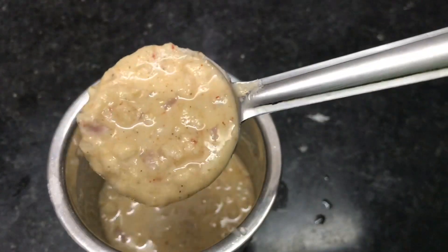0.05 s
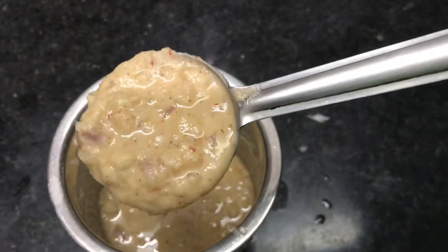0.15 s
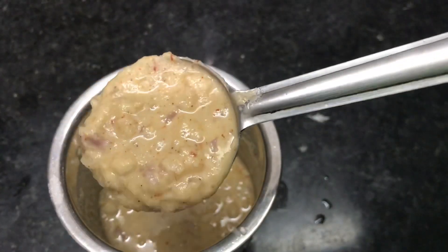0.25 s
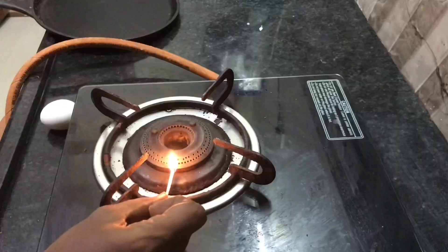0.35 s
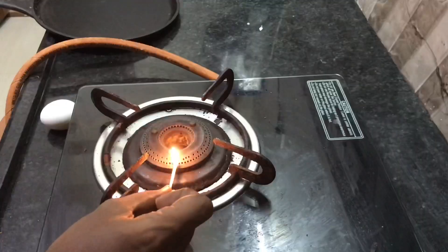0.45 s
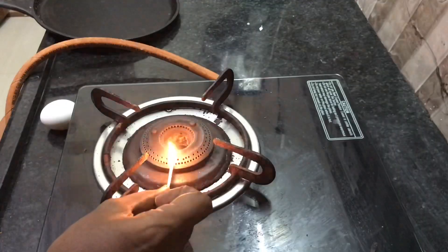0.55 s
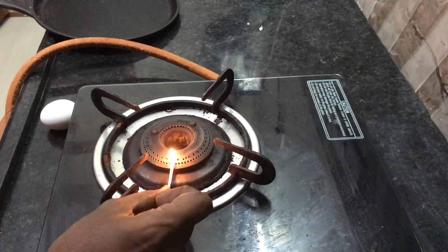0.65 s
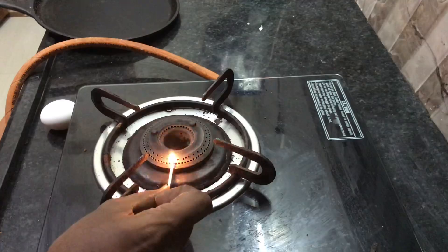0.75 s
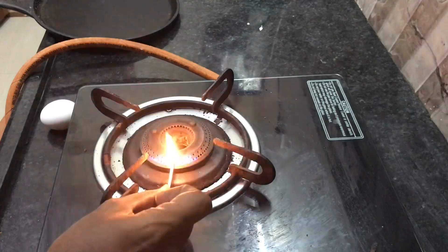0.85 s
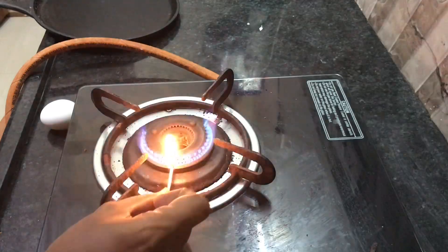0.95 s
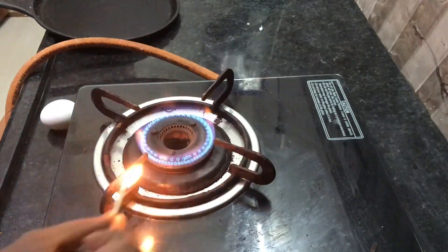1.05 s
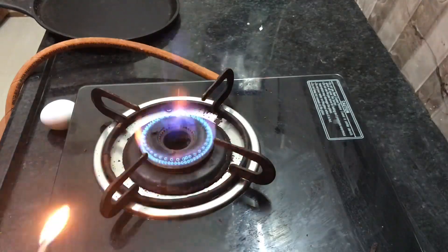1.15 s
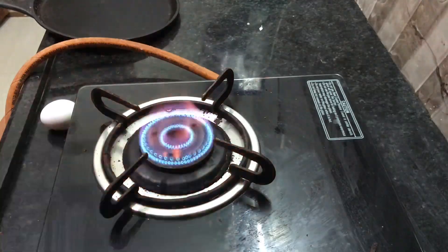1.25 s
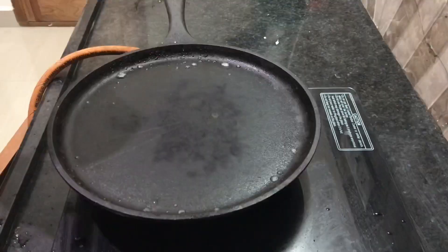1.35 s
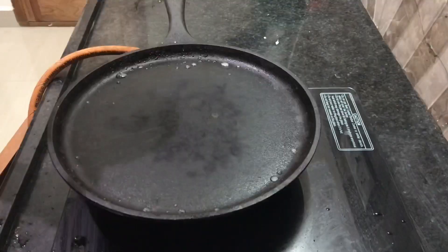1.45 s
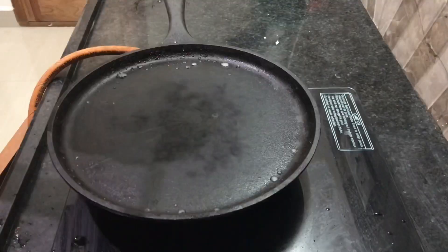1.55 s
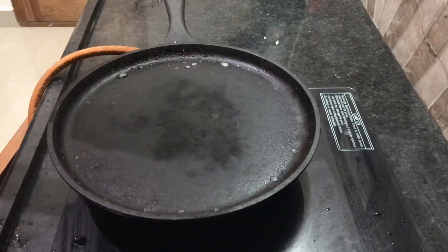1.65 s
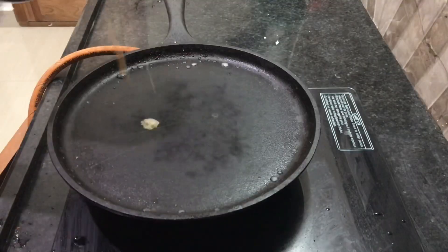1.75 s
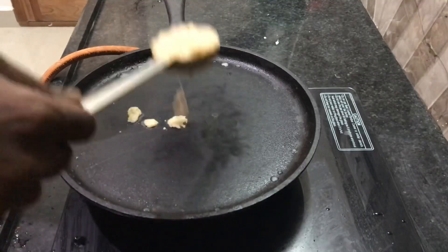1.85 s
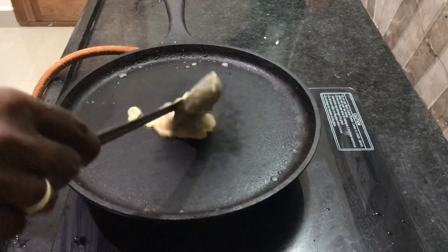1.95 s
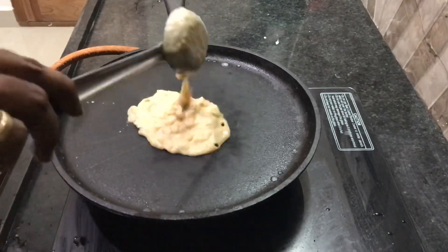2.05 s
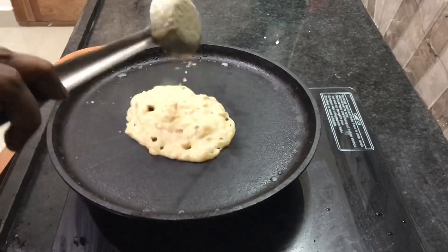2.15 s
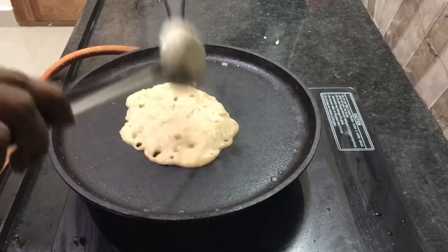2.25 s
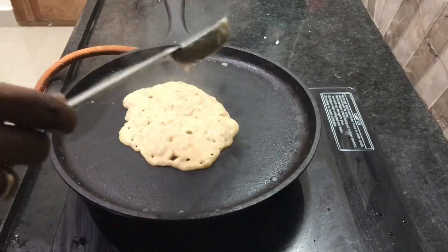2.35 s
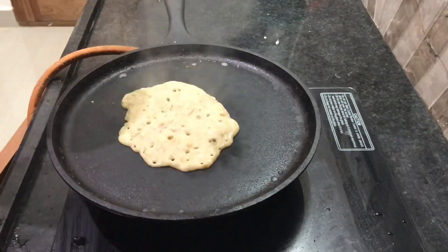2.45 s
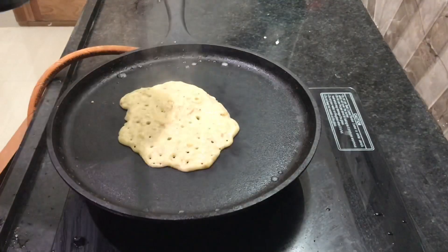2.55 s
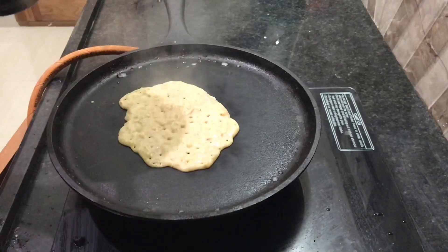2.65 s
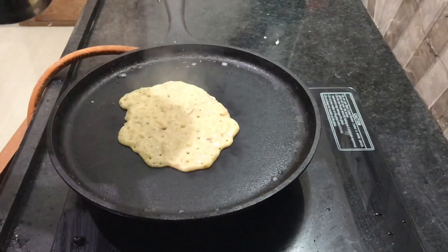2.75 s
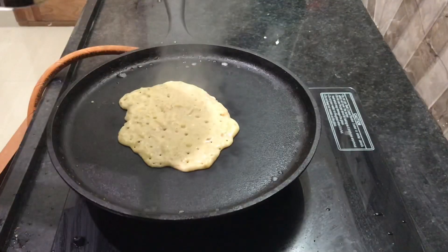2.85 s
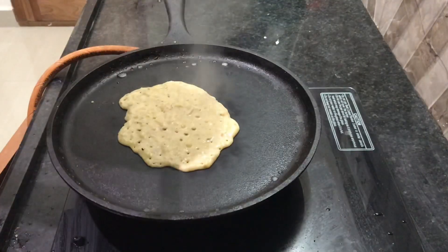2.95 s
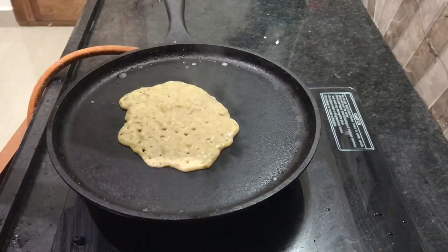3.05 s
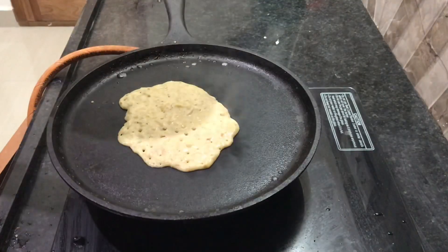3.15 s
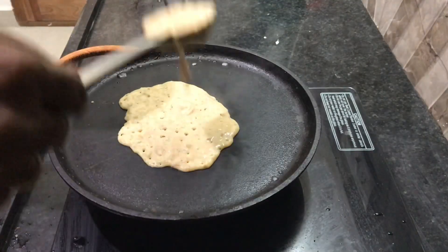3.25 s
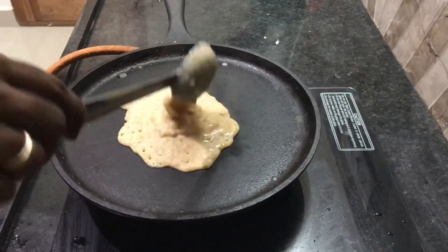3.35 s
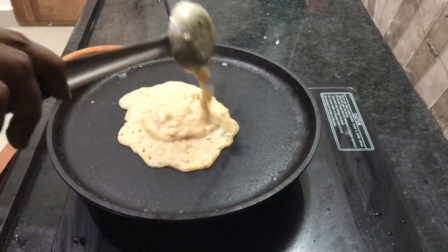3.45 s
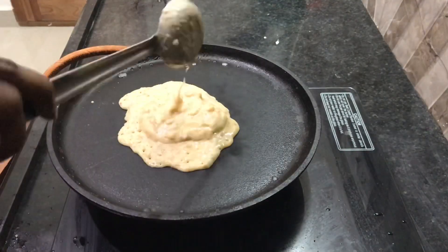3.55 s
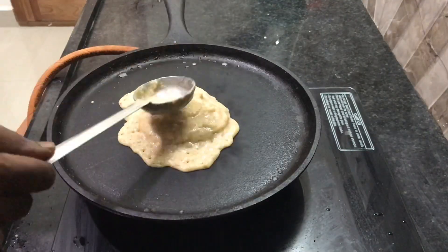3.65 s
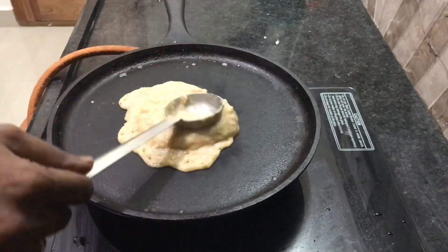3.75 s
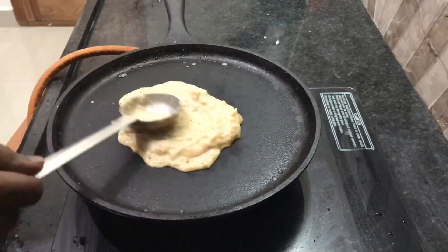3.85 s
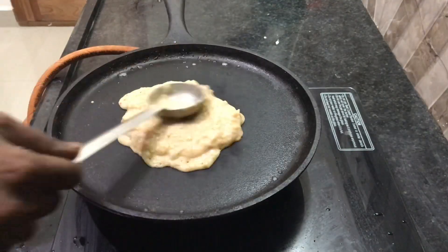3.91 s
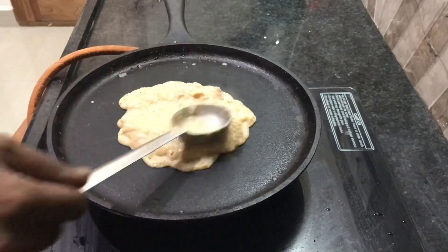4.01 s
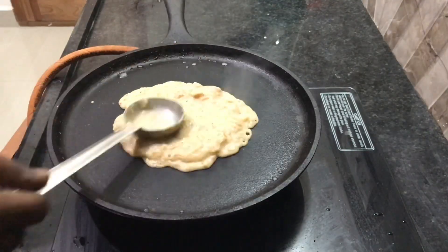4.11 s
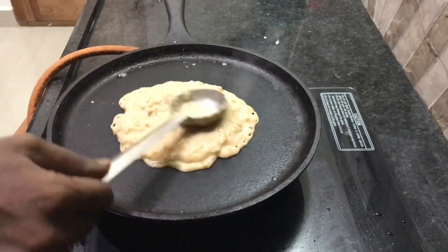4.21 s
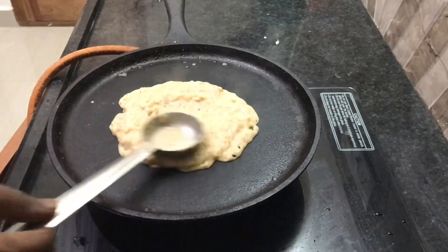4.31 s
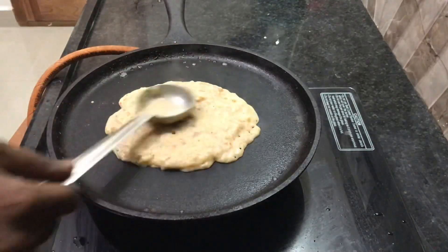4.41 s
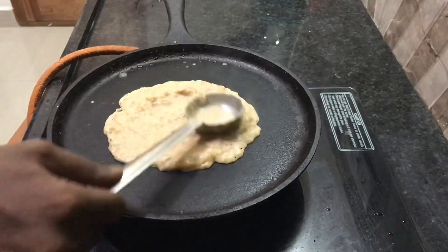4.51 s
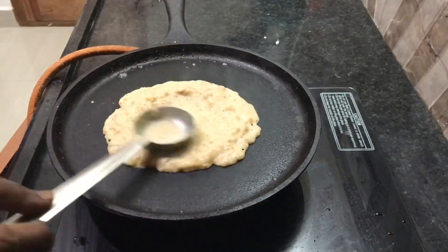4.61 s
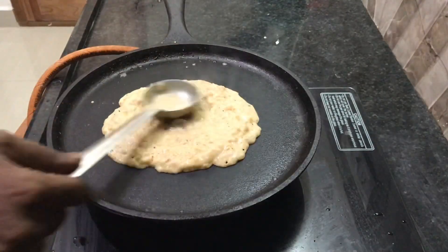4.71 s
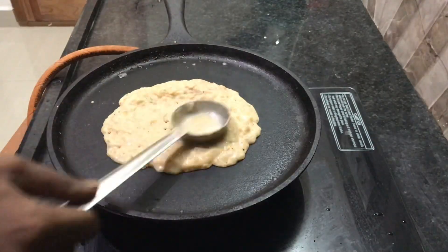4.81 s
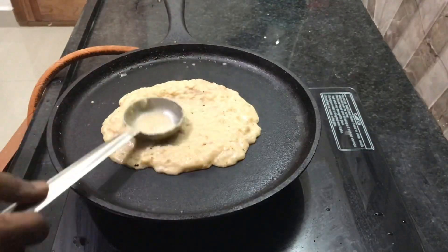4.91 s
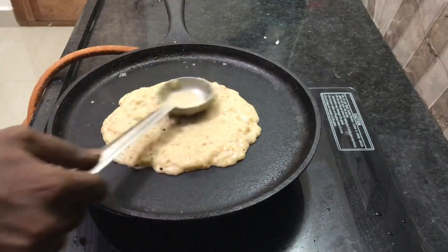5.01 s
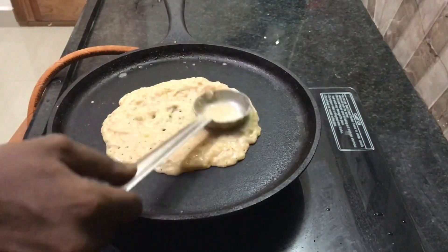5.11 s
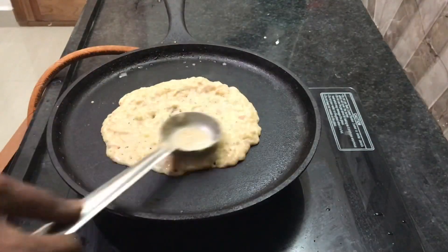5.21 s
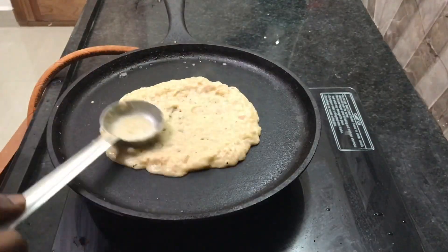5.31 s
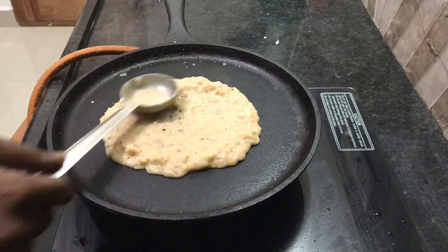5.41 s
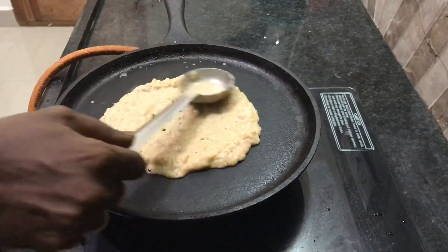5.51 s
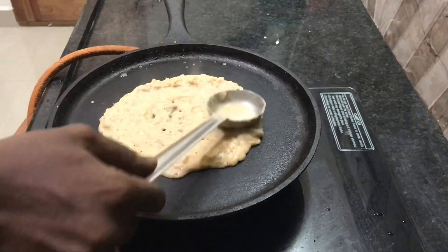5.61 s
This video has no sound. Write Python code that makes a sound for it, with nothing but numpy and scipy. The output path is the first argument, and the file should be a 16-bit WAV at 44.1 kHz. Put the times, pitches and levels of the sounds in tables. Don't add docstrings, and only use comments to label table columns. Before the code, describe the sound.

Three abruptly joined pieces, all close and nearly mono in a hard-walled home kitchen: quiet machine hum; knob and match knocks, one of them sharp, then gas igniting in two deep booms with crackling pops; lastly batter poured on hot iron, sizzling strongly, thinning to sparse spits, then swelling again with loud single steam bursts under the ladle.

```python
import sys
import numpy as np
from scipy import signal
from scipy.fft import rfft, irfft, next_fast_len
from scipy.io import wavfile
from scipy.ndimage import uniform_filter1d

SR = 44100
rng = np.random.default_rng(int(sys.argv[2]) if len(sys.argv) > 2 else 0)


def waveform_to_disk(signal):
    frames = np.transpose(np.atleast_2d(signal))
    scaled = np.clip(frames, -1, 1) * 32767
    samples = np.round(scaled).astype(np.int16)
    wavfile.write(sys.argv[1], SR, samples)


def amplitude_ratio(level_db):
    exponent = np.asarray(level_db, float) / 20
    return 10 ** exponent


N = 250047
T = np.arange(N) / SR

CUTS_S = [
    0.3204,
    1.318,
]
FADES_OUT_S = (.025, .022)
FADES_IN_S = (.03, .045)

# (frequency [Hz], density [dB per Hz])
ROOM_SPECTRA = [
    [(35, -52), (60, -26), (98, -17), (124, -15), (232, -12), (361, -11), (445, -11.5), (982, -22.5),
     (1530, -26.5), (3150, -34), (3620, -35), (4070, -40), (15700, -47.5)],
    [(35, -59), (60, -10.5), (260, -5.5), (361, -6.5), (477, -12), (815, -13.5), (937, -24), (1180, -19),
     (1970, -27.5), (3790, -31.5), (5500, -40), (7110, -39.5), (15700, -42)],
    [(35, -68), (60, -56), (86, -12.5), (145, -12.5), (308, -7), (333, -3), (388, -10.5), (426, -8.5),
     (687, -14.5), (1130, -21), (2400, -29.5), (3120, -60), (5280, -120)],
]
ROOM_LEVELS_DB = [-52.5, -49.5, -55.5]
# (frequency [Hz], width [Hz], level [dB], steadiness [ratio])
ROOM_TONES = [
    [(97.5, 1.8, -61.5, 3), (192, 7, -67, 1.7), (764, 10, -71, 1.5), (7400, 500, -82, .05),
     (230.3, 18, -63, 1.2), (300, 23, -77, 0.44), (1560, 11, -75.5, 0.81), (2116, 18, -77, .6),
     (3740, 53, -77, 1.2), (6980, 26, -85, .8), (7230, 20, -78, 2.8)],
    [(363, 13, -58, 1.7), (533, 5.1, -62.5, 0.78), (6950, 180, -77, .05), (7300, 170, -77.5, 0.31),
     (7600, 160, -86, .05)],
    [(199.3, 9.5, -66.5, 0.55), (389.4, 5.1, -65, 3.4), (1612, 12, -76.5, 2.3), (2460, 60, -78, 0.35)],
]
# (on [s], off [s], frequency [Hz], level [dB])
JET_WHISTLE = (.8, 1.1, 4480, -76)
HUM_HZ, HUM_DB = 98.4, -68
BEAT_HZ, BEAT_TOP_S, BEAT_SHARE = .87, 2.0, .55

# (time [s], flare [dB], upper boom over deep boom [dB])
FLARES = [
    (0.82, -65, 0),
    (0.902, -48, -2),
    (1.01, -47.5, 6.5),
    (1.048, -57, 14),
    (1.094, -74, 8),
    (1.178, -36, -8),
    (1.22, -42.5, -3.5),
    (1.278, -55.5, 8.5),
    (1.31, -87, 4),
]
# (frequency [Hz], width [Hz], level [dB])
HOLLOW_MODES = [
    [(129, 45, -5.5), (204.4, 22, 0.5)],
    [(278, 39, 6), (373, 39, 4), (510, 22, -28)],
]

# (time [s], peak [dB], thump [dB], body [dB], edge [dB])
STOVE_KNOCKS = [
    (.4104, -42.5, 6, 4, -28),
    (.533, -58.5, -2, 15, -14),
    (.5490, -51, 1.5, 12, -15),
    (.5552, -43.5, 10, 11, -3),
    (.5646, -23, -19, -5.5, -36),
    (.7686, -40.5, 3, 3, -28),
]
# (time [s], peak [dB], edge [dB])
FLAME_POPS = [(1.1614, -58, -16), (1.176, -44, -11), (1.1813, -48, -11), (1.1884, -49, -15),
              (1.1993, -46.5, -17), (1.219, -59, -6), (1.2396, -59, 6), (1.2472, -55, -19),
              (1.257, -50, -13)]
# (frequency [Hz], level [dB], T60 [s])
STEEL_MODES = [(688, 1, 0.071), (1387, 3.5, 0.053), (1590, -4.5, 0.1), (2090, -15, 0.027),
               (2740, -7, 0.073), (3780, 2.5, 0.07), (4888, -26, 0.22), (5830, -26, 0.13),
               (6850, -23, 0.26), (7340, -28, 0.032), (8750, -27, 0.14), (9900, -34, 0.13)]
KNOCK_T60_S, POP_T60_S = 0.11, 0.039
POP_THUMP_DB, POP_BODY_DB = -8, 15

# (time [s], peak [dB])
LONE_BURSTS = [(1.7979, -25), (2.6965, -20), (2.9028, -21), (3.0969, -25), (3.2316, -29), (3.3069, -27),
               (3.3505, -31), (3.3956, -30), (3.4166, -31), (3.4871, -33), (3.5051, -26), (3.5638, -32),
               (3.6459, -34), (3.7133, -35), (3.7526, -32), (3.798, -28), (3.8855, -25), (4.0603, -19),
               (4.1605, -20), (4.4686, -17), (4.5204, -22), (5.2124, -27), (5.2229, -25), (5.2598, -26),
               (5.282, -25), (5.3033, -26), (5.3627, -27), (5.3787, -26), (5.4021, -27), (5.4603, -28)]
# (time [s], peak [dB], frequency [Hz])
OIL_SNAPS = [
    (1.367, -47, 7400),
    (1.3756, -55, 4120),
    (1.3933, -40, 4220),
    (1.5164, -55, 11700),
    (1.6534, -48, 5560),
    (1.711, -47, 7000),
    (1.723, -41.5, 10300),
    (1.7628, -43, 6940),
]

# (time [s], vigour [dB], freshness of the wet edge [0-1])
BOIL_COURSE = [(1.762, -60, .8), (1.77, -46.5, 0.62), (1.95, -39.5, 0.68), (2.15, -36.5, 0.44),
               (2.45, -38, 0.65), (2.9, -42.5, 0.34), (3.35, -49, 0.13), (3.72, -54, .3),
               (3.76, -50.5, 0.52), (3.93, -47.5, 0.7), (3.985, -42, 0.73), (4.08, -41.5, 0.87),
               (4.2, -41, 0.7), (4.4, -40.5, .45), (4.62, -41.5, 0.48), (5.19, -45, .3), (5.26, -46, .55),
               (5.6, -46.5, 0.3)]
# (frequency [Hz], density [dB per Hz])
LARGE_BUBBLES = [(500, -35.5), (620, -29), (760, -17), (900, -19.5), (1300, -8), (1620, -15.5),
                 (1850, -10.5), (2150, -13), (2500, -14.5), (2650, -38.5)]
# (frequency [Hz], density [dB per Hz])
POUR_BUBBLES = [(2450, -43.5), (2600, -6), (2750, -4.5), (2950, -8.5), (3200, -4), (3700, -3), (4280, -7),
                (4700, -2.5), (5200, -3.5), (6500, -0.5), (8000, 3), (10200, 6.5), (14400, 3.5),
                (15800, -1)]
# (frequency [Hz], density [dB per Hz])
SPREAD_BUBBLES = [(2450, -34), (2600, -9), (3800, -3), (4150, -5), (4450, -2), (5250, -6), (6200, 0),
                  (6700, 0.5), (7550, 0), (7900, 5.5), (9500, 5), (10300, 6), (12500, 4), (15800, -1)]
SPREAD_S = 3.74
BURSTS_PER_S, SIZE_SPREAD_DB = 9000, 5
OIL_DB, OIL_FRESH = -64.5, 0.24
FINE_DB, FINE_FRESH_DB = 1.5, 8.5
LARGE_DB, LARGE_FRESH_DB = -9, -2.5
RUMBLE_DB, RUMBLE_FOLLOWS, FULL_BOIL_DB = -57, 1, -37.5

# (time [s], length [s], level [dB])
SPLICE_TICK = (.314, 0.0047, -69)
MIC_STEP_HZ = [12090, 12190, 13200, 14500, 15740, 15830]
MIC_STEP_DB = [0, -9.5, 0.5, -2.5, 3, -70]
LOW_CUT_HZ = 90
# (time [s], low [Hz], high [Hz])
UNLIKE_BANDS = [(.476, 4700, 5700), (2.287, 12400, 13900), (2.334, 13800, 15300), (2.334, 8300, 9700),
                (2.427, 6900, 8300), (2.682, 4200, 5200), (4.029, 4700, 6300), (4.238, 9000, 11100),
                (4.238, 4200, 5200), (4.795, 14500, 15800), (4.795, 4700, 5700)]
UNLIKE_DB = -4


def evened(x):
    return x / np.sqrt(np.mean(x ** 2) + 1e-20)


def read(points, hz):
    f, value = np.transpose(points)
    return np.interp(np.log(hz + 1), np.log(f + 1), value)


def add(mix, s, sound):
    part = mix[round(s * SR):][:len(sound)]
    part += sound[:len(part)]


def band(x, lo_hz, hi_hz, order=2):
    sos = signal.butter(order, [lo_hz, min(hi_hz, SR / 2.1)], "bandpass", fs=SR, output="sos")
    return signal.sosfilt(sos, x)


def resonate(x, hz, width_hz):
    r = np.exp(-np.pi * 1.55 * width_hz / SR)
    pole = [1, -r * np.exp(2j * np.pi * hz / SR)]
    return 2 * signal.lfilter([(1 - r) ** 2], np.convolve(pole, pole), x).real


def wander(hz):
    count = 100 + int(T[-1] * hz)
    return evened(np.interp(T * hz, np.arange(count), rng.standard_normal(count)))


def colour(x, points):
    gain_db = np.maximum(read(points, abs(np.fft.fftfreq(4096, 1 / SR))), -100)
    log_gain = np.log(amplitude_ratio(gain_db))
    taps = np.fft.ifft(np.exp(np.conj(signal.hilbert(log_gain)))).real[:2048]
    return signal.oaconvolve(x, taps)[:len(x)]


def walls(x, t60_s, wet_db, turns_hz):
    at, out = np.arange(60, SR // 2, 24), x.copy()
    turn = 2 * np.pi * turns_hz * T
    for share in (np.cos(turn), np.sin(turn)):
        taps = np.zeros(SR // 2 + 24)
        signs = rng.choice([-1., 1.], len(at))
        taps[at + rng.integers(0, 24, len(at))] = signs * amplitude_ratio(-60 * at / SR / t60_s)
        out += amplitude_ratio(wet_db) * signal.fftconvolve(x * share, taps / np.linalg.norm(taps))[:N]
    return out


def fuzzy_tone(hz, width_hz, steady, phase_turns=0.):
    pure = np.sin(2 * np.pi * (hz * T + phase_turns))
    return evened(steady * pure + evened(resonate(rng.standard_normal(N), hz, width_hz)))


def rooms():
    shot, out = np.searchsorted(CUTS_S, T), np.zeros(N)
    for k, (points, db, tones) in enumerate(zip(ROOM_SPECTRA, ROOM_LEVELS_DB, ROOM_TONES)):
        air = amplitude_ratio(db - 4.5) * evened(colour(rng.standard_normal(N), points))
        for hz, width_hz, tone_db, steady in tones:
            air += amplitude_ratio(tone_db) * fuzzy_tone(hz, width_hz, np.sqrt(2) * steady, rng.random())
        out += air * (shot == k)
    turns = 2 * np.pi * (T - BEAT_TOP_S)
    motors = np.sin(HUM_HZ * turns) + BEAT_SHARE * np.sin((HUM_HZ + BEAT_HZ) * turns)
    out += amplitude_ratio(HUM_DB) * motors * (shot == 2)
    on, off, hz, db = JET_WHISTLE
    valve = np.interp(T, [on, on + .06, off - .1, off], [0, 1, .6, 0])
    return out + amplitude_ratio(db) * fuzzy_tone(hz, 25, 2.5) * valve


def flame():
    s, flare_db, height_db = np.transpose(FLARES)
    lumps, out = amplitude_ratio(2.5 * wander(44.5)) * rng.standard_normal(N), np.zeros(N)
    for level_db, hollows in zip([flare_db, flare_db + height_db], HOLLOW_MODES):
        modes = [amplitude_ratio(db) * evened(resonate(lumps, hz, width_hz)) for hz, width_hz, db in hollows]
        boom = evened(sum(modes))
        loudness = np.sqrt(uniform_filter1d(boom ** 2, 2000))
        out += amplitude_ratio(np.interp(T, s, level_db - .6, -120, -120)) * boom / loudness ** 1.06
    return band(out, 94, 1200)


def knocks(rows, t60_s):
    out, t = np.zeros(N), np.arange(8000) / SR
    noise = rng.standard_normal((len(rows), len(t)))
    detune = rng.uniform(.96, 1.04, (len(rows), len(STEEL_MODES)))
    for (s, db, thump_db, body_db, edge_db), crack, tune in zip(rows, noise, detune):
        ring = np.zeros(len(t))
        for (hz, mode_db, ring_s), k in zip(STEEL_MODES, tune):
            decay = amplitude_ratio(mode_db - 60 * t / min(ring_s, 0.78 * t60_s))
            ring += decay * np.sin(2 * np.pi * hz * k * t)
        blow = crack * (amplitude_ratio(-60 * t / t60_s) + 1.2 * amplitude_ratio(-60 * t / .012)) + .16 * ring
        parts = [(thump_db - 7.0, band(blow, 175, 510)),
                 (body_db, band(blow + 0.15 * ring, 600, 2150)),
                 (0, band(blow * amplitude_ratio(-25 * t / t60_s), 1530, 6300)),
                 (edge_db, band(blow, 7000, 11200, order=3))]
        add(out, s - .001, sum(amplitude_ratio(db + d) * p / abs(p).max() for d, p in parts))
    return out


def spits():
    out, t = np.zeros(N), np.arange(600) / SR
    snap = colour(np.eye(1, 600)[0], POUR_BUBBLES)
    for s, db in LONE_BURSTS:
        add(out, s, amplitude_ratio(db + 2.5) * snap / abs(snap).max())
    for s, db, hz in OIL_SNAPS:
        fizz = band(rng.standard_normal(len(t)), 0.38 * hz, 2.1 * hz)
        drop = 0.9 * np.sin(2 * np.pi * hz * t) + 1.3 * fizz
        add(out, s, amplitude_ratio(db - 60 * t / 0.016 - 3.5) * drop)
    return out


def sizzle():
    s, boil_db, freshness = np.transpose(BOIL_COURSE)
    vigour_db = np.interp(T, s, boil_db, OIL_DB)
    fresh = np.interp(T, s, freshness, OIL_FRESH)
    size_db = SIZE_SPREAD_DB * np.minimum(rng.exponential(1, N), 3.1)
    size = amplitude_ratio(size_db) * rng.choice([-1., 1.], N)
    bursts = evened(size * (rng.random(N) < BURSTS_PER_S / SR))
    merged = np.interp(vigour_db, [-56, -37], [.6, 1.3])
    bursts = (bursts + merged * rng.standard_normal(N)) / np.sqrt(1 + merged ** 2)
    bursts *= amplitude_ratio(0.53 / merged * wander(45))

    small = evened(colour(bursts * (T < SPREAD_S), POUR_BUBBLES)) * np.sqrt(SPREAD_S / T[-1])
    small += evened(colour(bursts * (T >= SPREAD_S), SPREAD_BUBBLES)) * np.sqrt(1 - SPREAD_S / T[-1])
    treble = read([(5000, 0), (9000, 1)], np.fft.rfftfreq(N, 1 / SR))
    fine = irfft(rfft(small) * treble, N)
    out = evened(small - fine) * amplitude_ratio(0.66 * wander(6.8))
    out += evened(fine) * amplitude_ratio(FINE_DB + FINE_FRESH_DB * fresh + 0.45 * wander(14))
    large_db = LARGE_DB + LARGE_FRESH_DB * fresh + 0.16 * wander(9)
    out += evened(colour(bursts, LARGE_BUBBLES)) * amplitude_ratio(large_db)

    rumble_db = RUMBLE_DB + RUMBLE_FOLLOWS * (vigour_db - FULL_BOIL_DB)
    rumble = evened(band(rng.standard_normal(N), 127, 390)) * amplitude_ratio(rumble_db)
    return (out * amplitude_ratio(vigour_db) + rumble) * (T > CUTS_S[1])


def scene():
    pop_rows = [(s, db, POP_THUMP_DB, POP_BODY_DB, edge_db) for s, db, edge_db in FLAME_POPS]
    pops = amplitude_ratio(-7.0) * walls(knocks(pop_rows, POP_T60_S), t60_s=0.18, wet_db=-7, turns_hz=0.58)
    steel = walls(knocks(STOVE_KNOCKS, KNOCK_T60_S), t60_s=0.28, wet_db=-7.5, turns_hz=0.099)
    pan = amplitude_ratio(-.6) * walls(spits() + sizzle(), t60_s=.09, wet_db=-9.5, turns_hz=.2)
    mono = rooms() + flame() + steel + pops + pan
    for cut, out_s, in_s in zip(CUTS_S, FADES_OUT_S, FADES_IN_S):
        mono = mono * np.clip(np.where(T < cut, (cut - T) / out_s, (T - cut) / in_s), .06, 1)
    s, length_s, db = SPLICE_TICK
    tick = band(rng.standard_normal(round(length_s * SR)), 1500, 15000)
    add(mono, s, amplitude_ratio(db) * evened(tick))
    return np.array([mono, mono])


def unlike_noise(mid):
    side = np.zeros(N)
    window = signal.windows.kaiser_bessel_derived(2048, 4 * np.pi)
    for s, lo_hz, hi_hz in UNLIKE_BANDS:
        start = 520 + 1024 * round((s * SR - 520) / 1024) - 1024
        bins = np.arange(lo_hz * 2048 // SR, hi_hz * 2048 // SR)
        waves = window * np.cos(np.pi / 1024 * np.outer(bins + .5, np.arange(2048) + 512.5))
        scrambled = rng.permutation(waves @ mid[start:start + 2048])
        add(side, start / SR, amplitude_ratio(UNLIKE_DB) * scrambled @ waves / 512)
    return side


def top_cut(x):
    return signal.sosfilt(signal.butter(12, 15870, fs=SR, output="sos"), x)


def record(dry):
    size = next_fast_len(N + SR)
    hz = np.fft.rfftfreq(size, 1 / SR)
    bass_cut = np.sqrt(1 / (1 + (LOW_CUT_HZ / (hz + 1)) ** 14) + amplitude_ratio(-43))
    response = amplitude_ratio(np.interp(hz, MIC_STEP_HZ, MIC_STEP_DB)) * bass_cut
    unstep = amplitude_ratio(-np.interp(hz, MIC_STEP_HZ[:-1], MIC_STEP_DB[:-1]))
    spectrum = rfft(dry[0], size) * response
    near = irfft(spectrum, size)[:N]
    far = irfft(spectrum * unstep, size)[:N]
    mid = np.where(T > CUTS_S[1], near, far)
    side = unlike_noise(mid)
    return top_cut(np.array([mid + side, mid - side]))


dry = scene()
out = record(dry)
waveform_to_disk(out)
```